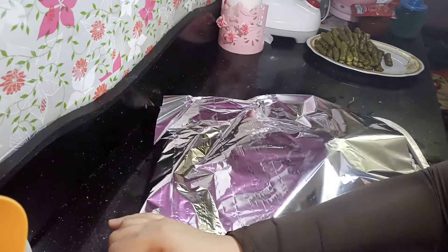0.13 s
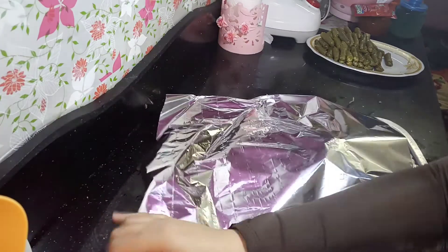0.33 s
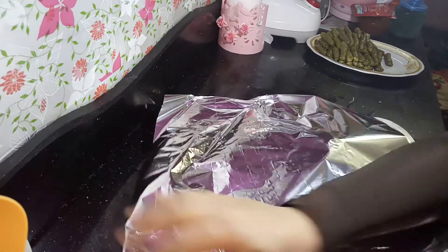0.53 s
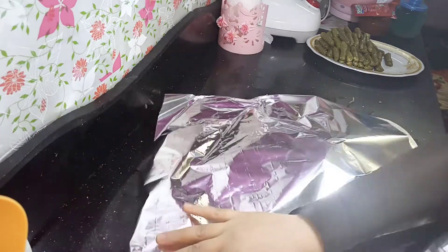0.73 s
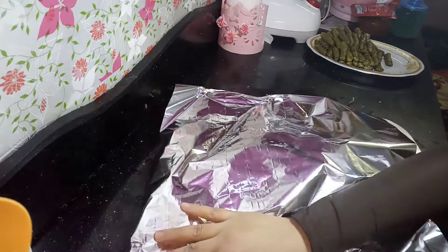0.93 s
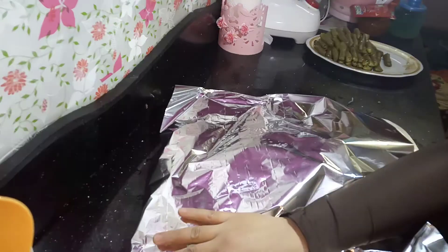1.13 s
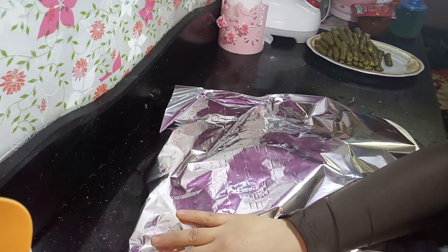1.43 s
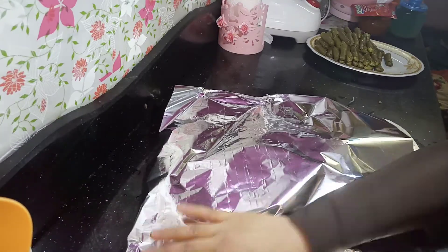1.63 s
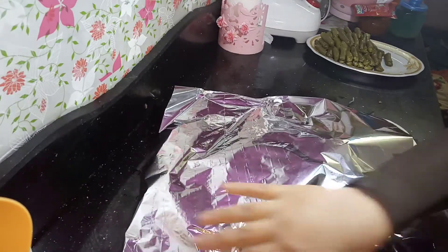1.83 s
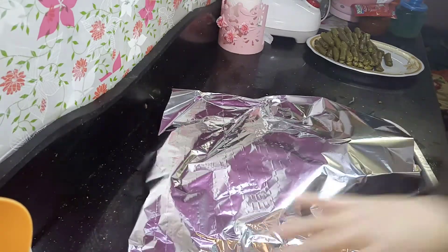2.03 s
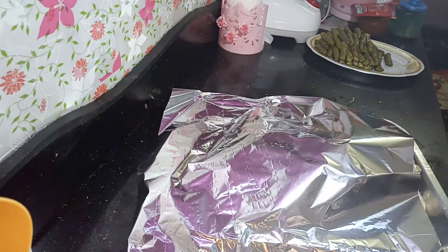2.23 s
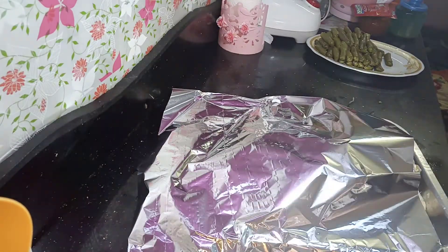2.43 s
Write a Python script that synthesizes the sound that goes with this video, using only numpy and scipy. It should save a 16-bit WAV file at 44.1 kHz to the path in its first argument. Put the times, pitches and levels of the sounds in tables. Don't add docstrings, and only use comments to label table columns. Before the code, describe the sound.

Bright, dense foil crinkling comes in irregular bursts over a thin rustle, strongest near the start and again late, with dull tray taps beneath, in a quiet kitchen recorded close in mono.

```python
import sys
import numpy as np
from scipy import signal
from scipy.fft import rfft, irfft, next_fast_len
from scipy.io import wavfile
from scipy.ndimage import uniform_filter1d, map_coordinates

SR = 44100
rng = np.random.default_rng(int(sys.argv[2]) if len(sys.argv) > 2 else 0)


def to_wav(sig):
    pcm = np.clip(np.atleast_2d(sig), -1, 1) * 32767
    pcm = np.round(pcm).astype(np.int16)
    wavfile.write(sys.argv[1], SR, pcm.T)


def level_to_linear(level):
    exponent = np.asarray(level, float) / 20
    return 10 ** exponent


N = 114660


def unit(x):
    return x / np.sqrt(np.mean(x ** 2) + 1e-20)


def along(points, hz):
    f, v = np.transpose(points)
    return np.interp(np.log(hz + 1), np.log(f + 1), v)


def wobble(rate):
    knots = rng.standard_normal(int(N * rate / SR) + 4)
    return map_coordinates(knots, [np.arange(N) * rate / SR])


def coloured(x, points):
    size = 4096
    gain = level_to_linear(along(points, np.fft.rfftfreq(size, 1 / SR)))
    cepstrum = irfft(np.log(gain))
    cepstrum[1:size // 2] *= 2
    cepstrum[size // 2 + 1:] = 0
    h = irfft(np.exp(rfft(cepstrum)))
    return signal.fftconvolve(x, h / np.linalg.norm(h))[:N]


# (time [s], rustle level [dB], large folds relative to it [dB])
STROKE = [(0, -27, -14.5), (0.039, -36, -10), (.12, -28, -22), (.16, -38.5, -7), (.3, -31, -10.5),
          (0.441, -25.5, -18), (.53, -30.5, -17), (.62, -34, -13), (.72, -29, -7), (0.861, -27, -10.5),
          (1.101, -34.5, -11), (1.29, -35.5, -10), (1.359, -28.5, -20), (1.59, -34.5, -13),
          (1.78, -35.5, -16.5), (1.815, -53, -6), (2.07, -38, -15), (2.6, -48, -11)]


def rustle():
    s, db, fold_db = np.transpose(STROKE)
    t = np.arange(N) / SR
    return level_to_linear(2 * np.interp(t, s, db)), level_to_linear(2 * np.interp(t, s, db + fold_db))


# (time [s], level [dB], hold [s], large folds relative to it [dB])
SLIDES = [(.06, -35, 0.046, -17), (0.164, -24.5, 0.029, -10), (0.18, -22, .03, -12),
          (.207, -17, 0.042, -17), (0.375, -29.5, 0.0067, -16), (.547, -27.5, 0.032, -25),
          (0.626, -28.5, 0.021, -31), (0.671, -24.5, 0.048, -28), (0.753, -25, 0.03, -12.5),
          (0.803, -26.5, 0.058, -20), (0.951, -39.5, 0.015, -4.5), (1.178, -28.5, 0.0074, -14),
          (1.231, -31.5, .015, -30), (1.389, -25.5, 0.0055, -14), (1.425, -26.5, 0.025, -14.5),
          (1.475, -23.5, 0.048, -24), (1.641, -29, 0.032, -16), (1.767, -37.5, 0.006, -30),
          (1.892, -31, 0.004, -15.5), (1.931, -27.5, 0.099, -14.5), (2.117, -32, 0.027, -38),
          (2.179, -35.5, 0.0087, -43), (2.225, -18, 0.0092, -26), (2.267, -25, 0.026, -22.5),
          (2.29, -35, 0.031, -29), (2.32, -34.5, 0.029, -21), (2.405, -32.5, 0.038, -23.5),
          (2.47, -37, 0.029, -38), (2.5, -33.5, 0.014, -36), (2.572, -41.5, 0.0053, -11)]


def avalanches():
    rise_s, fall_s = 0.00067, 0.017
    t = np.arange(N) / SR
    small, large = np.zeros(N), np.zeros(N)
    for start, level_db, hold, rel_db in SLIDES:
        u = np.maximum(t - start, 0)
        shape = (1 - np.exp(-u / rise_s)) ** 2 * np.exp(-2 * np.maximum(u - hold, 0) / fall_s)
        small += level_to_linear(2 * level_db) * shape
        large += level_to_linear(2 * (level_db + rel_db)) * shape
    return small, large


# (time [s], peak level [dB])
CRACKS = [(0.1665, -21), (0.1804, -6), (0.3571, -33), (0.634, -25), (0.6654, -17), (0.7597, -11),
          (1.1564, -20), (1.1825, -18), (1.2231, -31), (1.395, -20), (1.4524, -15), (1.485, -11),
          (1.7672, -18), (1.8297, -25.5), (1.8962, -17.5), (1.939, -17), (2.1205, -26), (2.1392, -19),
          (2.185, -20), (2.2016, -25), (2.2366, -7.5), (2.2892, -5.5), (2.331, -22), (2.347, -22),
          (2.376, -16.5), (2.4012, -18), (2.4127, -18), (2.4804, -30), (2.5, -18.5), (2.545, -27)]


def cracks():
    length_s, under_peak_db = 0.002, -6.5
    t, power = np.arange(N) / SR, np.zeros(N)
    for start, peak_db in CRACKS:
        burst = (t >= start - length_s / 3) * np.exp(-2 * np.abs(t - start) / length_s)
        power += level_to_linear(2 * (peak_db + under_peak_db)) * burst
    return power


def activity():
    steady_small, steady_large = rustle()
    slide_small, slide_large = avalanches()
    small = steady_small + slide_small + cracks()
    clump = level_to_linear(0.6 * wobble(31.3) + 1.5 * wobble(250))
    return np.sqrt(small) * clump, np.sqrt(steady_large + slide_large) * clump


def clicks(rate, size_db):
    chance, size, sign = rng.random(N), rng.exponential(1, N), rng.standard_normal(N)
    heights = level_to_linear(size_db * np.minimum(size, 3.5))
    return unit((chance < rate / SR) * heights * np.sign(sign) / np.sqrt(rate))


# (frequency [Hz], t60 [s])
SHIVER = [(300, 0.12), (2000, 0.13), (7000, 0.076), (12000, 0.06)]


def shivered(x, db, count):
    snap_s = 0.0006
    patch, out = rng.integers(0, count, N), np.zeros(N)
    for k in range(count):
        hz, t, z = signal.stft(rng.standard_normal(SR // 4), SR, nperseg=128)
        decay = level_to_linear(-60 * t / along(SHIVER, hz)[:, None])
        tail = signal.istft(z * decay, SR, nperseg=128)[1]
        snap = rng.standard_normal(len(tail)) * np.exp(-np.arange(len(tail)) / SR / snap_s)
        response = snap / np.linalg.norm(snap) + level_to_linear(db) * tail / np.linalg.norm(tail)
        out += signal.fftconvolve(x * (patch == k), response)[:N]
    return out


# (frequency [Hz], level [dB])
CREASE = [(500, -25.5), (1500, -21), (3300, -7), (5000, -12.5), (7400, -5.5), (10500, -14.5), (13000, -13),
          (15300, -8)]


def small_creases(strength):
    rate = 5000 * (strength / level_to_linear(-30)) ** 0.5
    snaps = coloured(shivered(strength * clicks(rate, size_db=1), db=3.5, count=24), CREASE)
    high_pass = signal.butter(4, 8900, "high", fs=SR, output="sos")
    treble = signal.sosfiltfilt(high_pass, snaps)
    recent_power = uniform_filter1d(strength ** 2, size=round(0.004 * SR))
    effort = np.sqrt(np.abs(recent_power)) / level_to_linear(-33.5)
    return snaps + treble * (effort ** 0.16 - 1)


def large_folds(strength):
    return shivered(strength * clicks(2500, size_db=4.5), db=5, count=16)


# (frequency [Hz], width [Hz], level [dB])
TRAY = [(173, 41, -7.5), (347, 27, -4.5), (478, 187, -3.5), (569, 41, 4.5), (819, 46, 0.5)]
# (time [s], level [dB])
CONTACT = [
    (0, 1.5),
    (.3, 1),
    (.68, 1),
    (.8, -1.5),
    (1.2, -1.5),
    (1.45, 2),
    (1.6, -6),
    (2.1, -4.5),
    (2.3, 2.5),
]


def tray(folds):
    x = folds * level_to_linear(np.interp(np.arange(N) / SR, *np.transpose(CONTACT)))
    m = next_fast_len(N + 8192)
    f = np.fft.rfftfreq(m, 1 / SR)
    modes = 0
    for hz, width, db in TRAY:
        modes = modes + level_to_linear(db) * 1j * f * width / (hz * hz - f * f + 1j * f * width)
    return irfft(rfft(x, m) * modes, m)[:N]


# (frequency [Hz], level [dB])
FOLD = [(150, -40), (450, -22.5), (700, -1), (850, 0), (1300, -1.5), (2500, -1.5), (5000, -5), (9000, -11)]


def foil():
    small, large = activity()
    snaps = small_creases(small)
    folds = large_folds(large)
    return level_to_linear(-8) * snaps + level_to_linear(-1.5) * coloured(folds, FOLD) + level_to_linear(2.5) * tray(folds)


# (time [s], level [dB], pitch [Hz], t60 [s])
TAPS = [(.19, -20.5, 1240, 0.041), (0.209, -23, 571, 0.12), (.228, -34.5, 143, 0.11),
        (.654, -36.5, 170, .15), (0.728, -42.5, 179, .15), (.79, -54, 169, .15), (.84, -60.5, 150, 0.24),
        (0.931, -46, 161, 0.092), (0.962, -34, 1150, 0.022), (1.187, -47, 325, .07),
        (1.45, -34, 510, 0.078), (1.767, -37.5, 980, 0.037), (2.222, -34, 507, 0.046),
        (2.237, -41, 129, 0.11), (2.282, -50, 121, 0.14), (1.404, -42, 414, 0.1), (1.8, -53, 95, 0.26),
        (2.529, -59, 396, 0.33)]
# (ratio to pitch [-], level [dB])
TAP_MODES = [(1.005, 0.5), (1.3, -4), (0.82, -16.5)]


def taps():
    out, t = np.zeros(N + SR), np.arange(SR // 2) / SR
    for s, db, hz, t60 in TAPS:
        ring = sum(level_to_linear(level) * np.sin(2 * np.pi * hz * ratio * t) for ratio, level in TAP_MODES)
        onset = 1 - np.exp(-t * hz / 0.55)
        out[round(s * SR):][:len(t)] += level_to_linear(db - 60 * t / t60) * onset * ring
    return out[:N]


# (frequency [Hz], level [dB])
ROOM = [(20, -43), (45, -10.5), (110, 7), (180, 0.5), (260, -20), (345, 0.5), (500, -14), (15000, -32)]


def room():
    level = level_to_linear(-62.5 + 1.4 * wobble(8.2))
    return level * coloured(rng.standard_normal(N), ROOM)


def scene():
    return (foil() + taps() + room())[None]


def low_pass(x):
    return signal.sosfilt(signal.butter(12, 16920, fs=SR, output="sos"), x)


def record(dry):
    port_hz, port_width_hz, port_db = 7320, 1130, 3.5
    low_cut_hz, top_hz = 45, 15830
    m = next_fast_len(N + 4096)
    f = np.fft.rfftfreq(m, 1 / SR)
    resonance = 1j * f * port_width_hz / (port_hz ** 2 - f * f + 1j * f * port_width_hz)
    port = 1 + level_to_linear(port_db) * resonance
    low_cut = (1j * f / (low_cut_hz + 1j * f)) ** 2
    heard = irfft(rfft(dry, m) * port * (f < top_hz) * low_cut, m)[:, :N]
    return low_pass(heard)


dry = scene()
out = record(dry)
to_wav(out)
```